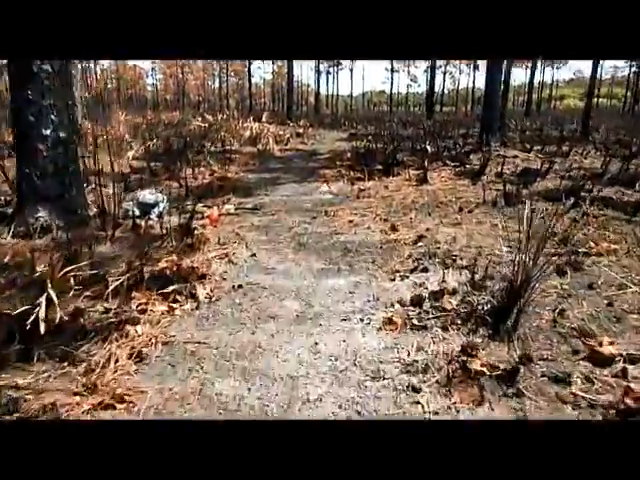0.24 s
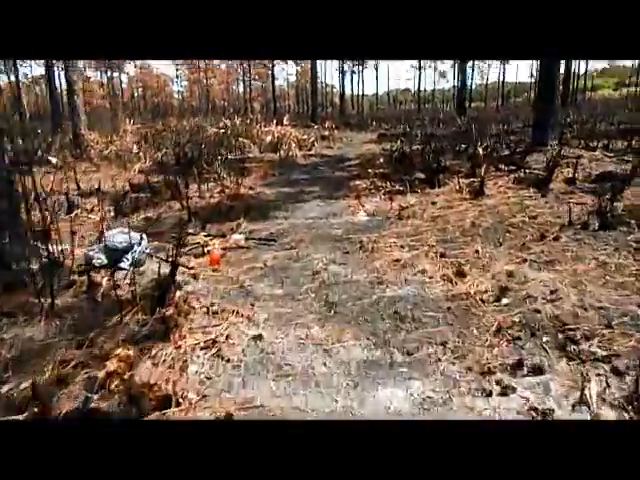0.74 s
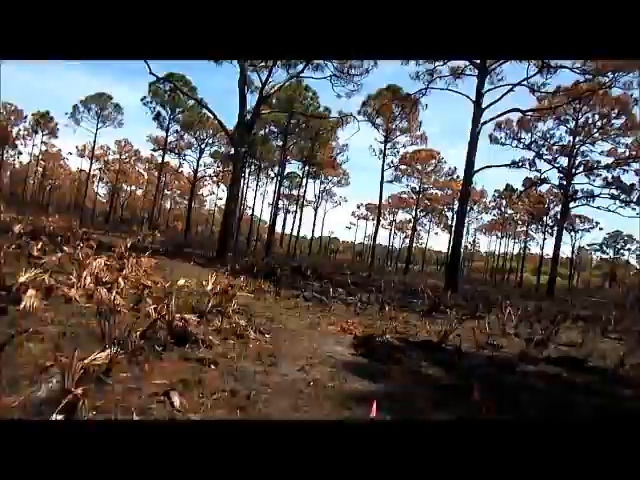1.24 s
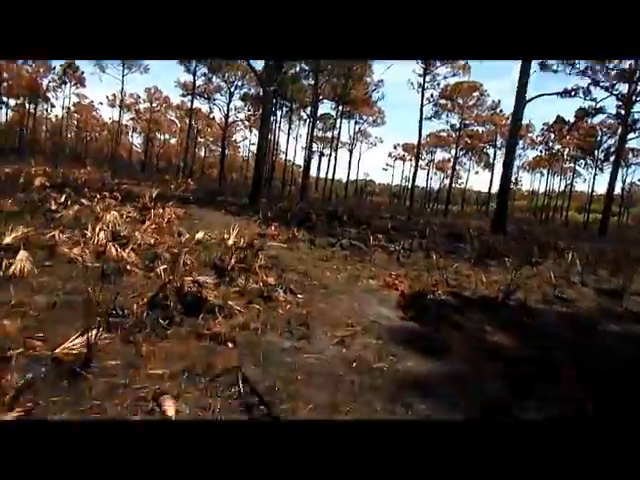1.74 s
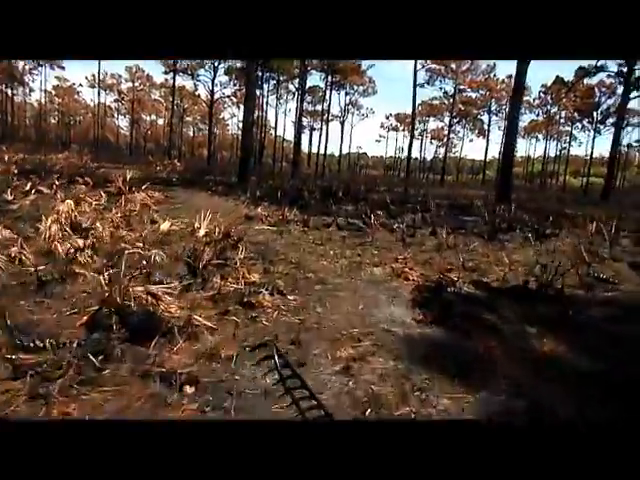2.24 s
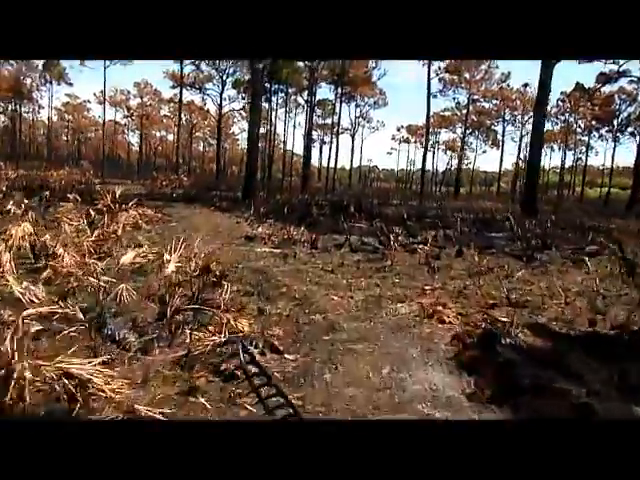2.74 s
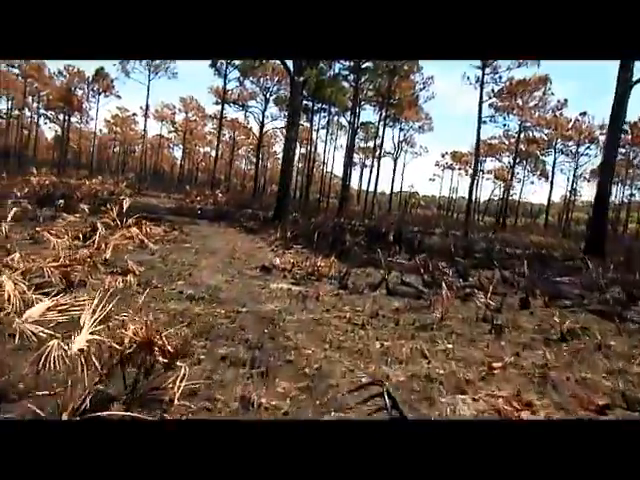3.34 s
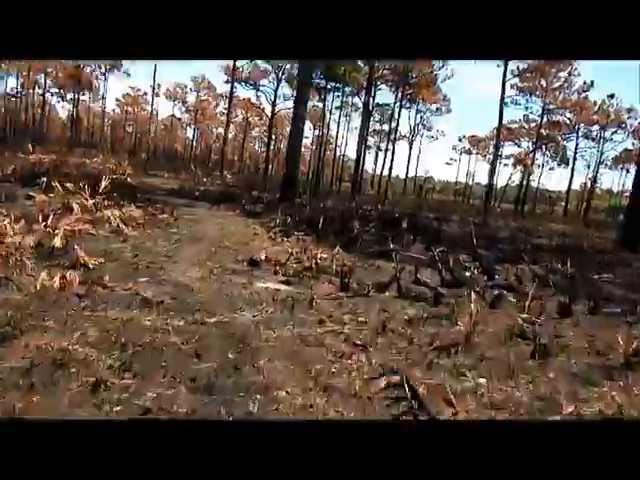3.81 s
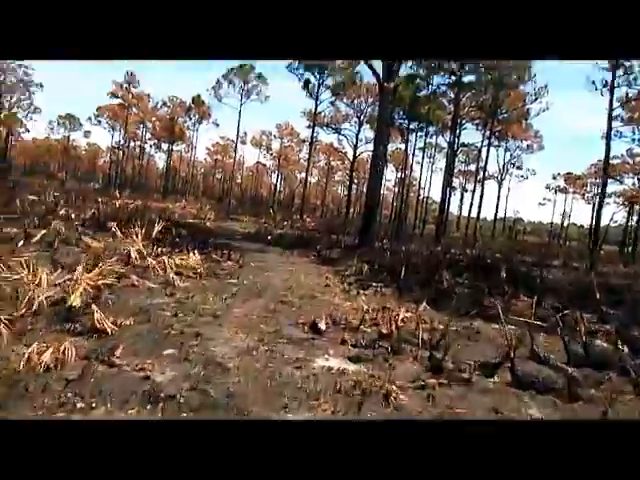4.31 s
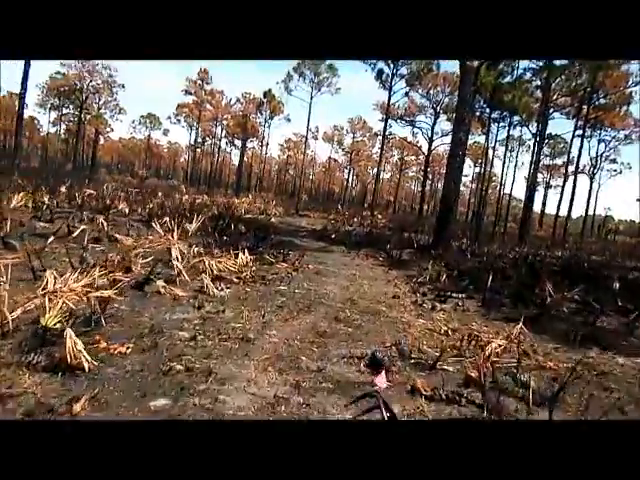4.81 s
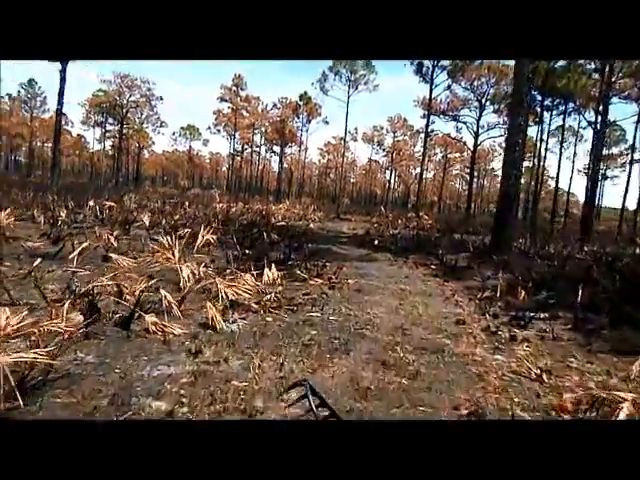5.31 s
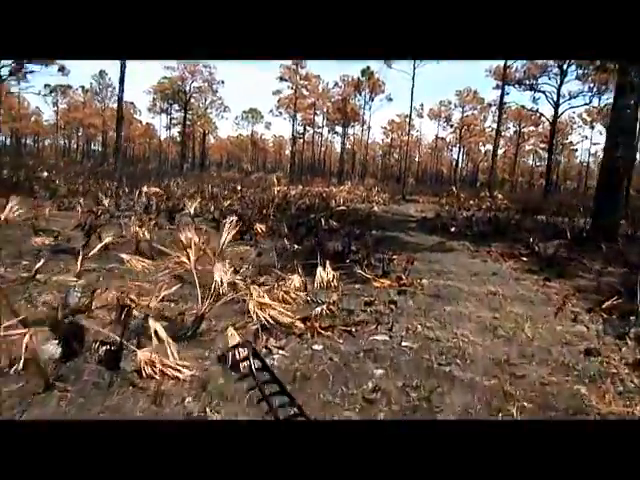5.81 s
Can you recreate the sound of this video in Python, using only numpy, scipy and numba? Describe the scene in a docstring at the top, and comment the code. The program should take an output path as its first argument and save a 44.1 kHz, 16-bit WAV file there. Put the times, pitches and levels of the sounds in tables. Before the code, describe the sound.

Continuous gritty crunching from bicycle tyres on sand, dead leaves and twigs, heard very close from a camera on the moving bike, outdoors with hardly any echo. Brittle pops and cracks jump out irregularly, a hard pair early on. Soft thuds carry through the frame at about half a second and two and a half seconds. A quick high bird trill sounds faintly in the distance, then crunching grows busier.

```python
"""Tyres of a mountain bike crush grit and burnt leaves on a dry trail, as dense short damped rings over a hiss.
Twigs snap as one ringing pitch with a spray of splinters; rumble and bumps reach the camera through the frame.
A sparrow whistles fast falling notes far off.
The rider's small camera hears through two ports: all but the frame sound reaches the right one a little first."""
import sys
import numpy as np
from scipy import signal
from scipy.fft import rfft, irfft
from scipy.io import wavfile
from scipy.ndimage import uniform_filter1d, minimum_filter1d, map_coordinates
from numba import njit

SR = 44100
rng = np.random.default_rng(int(sys.argv[2]) if len(sys.argv) > 2 else 0)


def materialize(psi):
    """Save the field psi as 16-bit PCM at rate SR to the path in sys.argv[1].

    A 1-D psi becomes a single channel; in a 2-D psi each row is a channel.
    """
    bounded = np.clip(np.atleast_2d(psi).T, -1, 1)
    quanta = np.round(bounded * 32767).astype(np.int16)
    wavfile.write(sys.argv[1], SR, quanta)


N = 267246
PORT_LAG, LAG_SPREAD = .95, .4  # samples: how late the left port is, and how much that varies with direction


# Tone of the crushed ground, with the camera housing: pitch_hz, relative level_db [dB per Hz]
LITTER_TONE = [(60, -66.5), (190, -17), (600, -4.5), (1200, -5.5), (2300, -0.5), (3000, 0.5), (4000, -5),
               (5500, -4), (6900, -1.5), (7900, -8.5), (10500, -15.5), (14000, -15), (15300, -18.5),
               (16300, -84)]
# Steady bed of grit under the tyres: start_s, relative level_db, extra_at_6khz_db, extra_from_12khz_db
GRIT_BED = [(0.0, -36, 3, -2), (0.29, -35.5, -3, -2.5), (1.5, -38.5, 0.5, -2), (1.59, -37, 0.5, 0.5),
            (3.22, -37, 1, -2.5), (3.43, -37.5, -1.5, 0), (4.32, -36.5, -1.5, 0), (5.1, -33.5, -3, -0.5),
            (5.38, -37.5, 3, 1), (5.67, -35, -4.5, 5.5), (6.06, -36.5, 2.5, -0.5)]
# Pitches where those three levels apply: pitch_hz
BED_PITCHES_HZ = [3000, 6000, 12000]


def litter(per_s=14000., fine=0.553, scatter_db=2.5, biggest=4.44, cycles=7.9, rise=0.27,
           clump_s=.012, clump_db=1.78, patch_s=.02, patch_db=2.5,
           dust_db=-7.0, sift_s=.08, sift_db=2.5, stir=0.65, apart=.55, litter_db=-32.5):
    """Grains of every size break in small clumps over sifting sand; both grow louder while a leaf is crushed."""
    bed_s, bed_db, treble_db, top_db = np.transpose(GRIT_BED)
    u = rng.random((150000, 5)).T
    start_s = np.cumsum(-np.log(1 - u[0]) / per_s)
    heard = start_s < N / SR
    start_s, u = start_s[heard], u[:, heard]
    # small bright grains are the most common: each higher octave holds more
    hz = np.maximum(16500 * u[1] ** (1 / fine), 150)

    db = np.interp(start_s, bed_s, bed_db) + crunching(start_s, hz)
    for extra_db, weights in ((treble_db, [0, 1, 0]), (top_db, [0, 0, 1])):
        weight = np.interp(np.log(hz), np.log(BED_PITCHES_HZ), weights)
        db += np.interp(start_s, bed_s, extra_db) * weight
    # each leaf crumbles as one
    db += clump_db * np.interp(start_s / clump_s, np.arange(2000), rng.standard_normal(2000))
    # and in its own range of pitch: one random level per half octave and patch_s
    half_octave = 2 * np.log2(hz / 300).clip(0)
    patches = rng.standard_normal((12, 1000))
    db += patch_db * map_coordinates(patches, [half_octave, start_s / patch_s], order=1)
    # a few grains are much stronger than the rest
    db += scatter_db * np.minimum(-np.log(1 - u[2]), biggest)
    size = hz ** (1 - fine / 2) * undb(db)  # size by pitch keeps the sum white
    lag = PORT_LAG + LAG_SPREAD * np.sqrt(12) * (u[3] - .5)
    grains = rings(start_s * SR, lag, hz, cycles * (.5 + u[4]), size, rise, N, 1. * SR)

    # sand is too fine for single grains: a hiss, its treble partly unlike at the two ports
    sand = late(rng.standard_normal(N), PORT_LAG)
    sand = sand + apart * high(rng.standard_normal((2, N)), 3900.0)
    now = np.arange(N) / SR
    # the sand lies unevenly
    drift_db = sift_db * np.interp(now / sift_s, np.arange(200), rng.standard_normal(200))
    steady_db = np.interp(now, bed_s, bed_db + (treble_db + top_db) / 2)
    stir_db = stir * crunching(now, 0 * now + BED_PITCHES_HZ[0])
    sand *= undb(steady_db + drift_db + stir_db)
    ground = level(grains, 0) + level(sand, dust_db)
    return level(colour(ground, LITTER_TONE), litter_db)


# Leaves and cones crushed, some at the same time, not strictly in order of start:
# start_s, length_s, level over the bed level_db, centre pitch_hz
CRUSHED = [(0.015, 0.085, 7.5, 5500), (0.11, 0.036, 5, 2960), (.163, 0.047, 4, 2700),
           (0.225, 0.043, 4, 2800), (.307, 0.13, 2.5, 3200), (0.466, 0.092, 2.5, 2780),
           (0.577, 0.066, 6.5, 2980), (0.812, 0.058, 3.5, 4500), (.9, 0.021, 4.5, 2830),
           (0.956, 0.039, 6, 3500), (.694, .12, 6.5, 3450), (1.031, 0.13, 5.5, 3370),
           (1.385, 0.032, 7, 1500), (1.429, 0.062, 8.5, 2870), (1.477, .1, 6, 2230),
           (1.62, 0.046, -0.5, 2490), (1.717, 0.15, 3.5, 3010), (1.867, 0.04, 9, 2810),
           (1.9, 0.057, 7, 2200), (1.998, 0.031, 6.5, 2750), (2.113, 0.073, 9, 2440),
           (2.21, 0.087, 4.5, 2230), (2.21, .05, 6, 11000), (2.3, 0.1, 6.5, 3040), (2.56, 0.063, 4.5, 3020),
           (2.635, 0.13, 3.5, 3000), (2.783, 0.14, 5.5, 2670), (3.028, 0.13, 5, 2920),
           (3.145, 0.12, 4.5, 2400), (3.344, .04, 6.5, 4500), (3.59, 0.049, 6, 2780),
           (3.862, 0.084, 7.5, 2860), (3.954, 0.052, 7, 2740), (4.09, 0.031, 9.5, 1190),
           (4.256, 0.021, 4, 2960), (4.318, .02, 10, 11000), (4.351, 0.063, 6, 2700),
           (4.505, .02, 9, 11000), (4.516, 0.077, 6.5, 3120), (4.574, 0.078, 4.5, 2610),
           (4.632, .015, 8, 11000), (4.652, 0.081, 6, 2390), (4.768, 0.042, 6, 2200),
           (4.854, 0.058, 4.5, 2870), (4.969, 0.033, 5.5, 2490), (5.007, 0.043, 6, 3500),
           (5.058, 0.023, 6, 2200), (5.112, 0.046, 9.5, 1410), (5.205, 0.044, 9.5, 2180),
           (5.28, .018, 8, 11000), (5.386, 0.023, 7, 3500), (5.422, 0.025, 10, 2300),
           (5.435, .015, 11, 13000), (5.49, 0.23, 5, 3410), (5.726, .095, 5, 3210), (5.87, 0.036, 6, 1500),
           (5.928, .05, 2.5, 6500), (5.992, 0.028, 2.5, 2910)]


def crunching(t, hz, half_width_octaves=1):
    """Gain in dB at times t and pitches hz: each crunch swells, fades and favours its own range."""
    power = np.ones(len(t))
    for start_s, length_s, level_db, centre_hz in CRUSHED:
        a, b = np.searchsorted(t, [start_s, start_s + length_s])
        swell = np.sqrt(np.sin(np.pi * (t[a:b] - start_s) / length_s))
        octaves = np.log2(hz[a:b] / centre_hz)
        near = np.exp(-.5 * (octaves / half_width_octaves) ** 2)
        power[a:b] += (undb(level_db) ** 2 - 1) * swell * near
    return 10 * np.log10(power.clip(.01))


# Twigs and leaf stems that break, levels relative:
# start_s, ring_level_db, ring_pitch_hz, splinter_level_db, brightness_db (per band), fade_s (to lose 60 dB)
TWIGS = [(.0235, -16, 6900, -14, 0.5, 0.036), (0.0562, -12, 5490, -30, 0, 0.013),
         (.0685, -3, 4520, -8, 5.5, 0.0041), (.2426, -13, 2890, -18, -2, 0.006),
         (.2644, -7.5, 2930, -15, -4, .011), (0.3177, -13, 2970, -12, 0.5, 0.013),
         (.3495, -11, 3420, -24, 2, .0035), (0.3658, -4.5, 3430, -10, 9, 0.0059),
         (0.3875, -20, 2450, -8, -0.5, 0.0082), (.4105, -22, 5450, -13, -5, 0.011),
         (.4988, -7.5, 3220, -16, 2, 0.0059), (.5047, -10, 3150, -10.5, -7, 0.004),
         (.5818, -21, 7000, -19, 3, 0.0082), (0.6226, -7, 2800, -27, 0, 0.0044),
         (0.7074, -11.5, 2860, -9, -0.5, 0.0039), (.7127, -7, 3240, -31, -4, 0.0036),
         (0.7451, 8, 3750, 2, 1, 0.0052), (0.7563, 8.5, 3370, -2.5, 7, 0.0065),
         (0.7615, -3, 3950, -12, 2, 0.011), (0.7704, -5, 3010, -5, 3, 0.019),
         (0.7915, -7.5, 4350, -27, -1, 0.0055), (0.912, -8, 2720, -30, 9, .0072),
         (.9617, -11, 3750, -19, -4, 0.0065), (1.0953, -18, 2470, -12.5, 2.5, 0.012),
         (1.1381, -4, 4700, -40, 0, 0.0032), (1.158, -12, 2850, -42, -5, 0.0041),
         (1.2737, -13, 3700, -22, -8, 0.0054), (1.4467, -12.5, 2800, -12.5, 4.5, 0.019),
         (1.4597, -6.5, 2920, -15, 11, 0.0079), (1.52, -16.5, 7060, -24.5, 16, .01),
         (1.624, -13.5, 2420, -33, 0, 0.011), (2.0614, -22, 2660, -23, -5, 0.0065),
         (2.1508, -6, 1800, -13.5, -3, 0.0052), (2.2397, -1.5, 1240, 0.5, 3, 0.0049),
         (2.2516, -13, 2250, -9, 5.5, .0055), (2.2746, -10.5, 1720, -18, -4.5, 0.0067),
         (2.3871, 5.5, 2350, -18, -9.5, 0.0085), (2.4028, -1, 1950, -4, 1, 0.0055),
         (2.8044, -6.5, 2630, -19, -5.5, 0.005), (3.1972, -13, 1860, -31, 0, 0.0065),
         (3.2738, -6.5, 2940, -18, -3, 0.0054), (3.3139, -2, 5220, -8, 3.5, 0.019),
         (3.3375, -20, 3540, -9.5, 3, 0.0064), (3.516, -12, 3020, -13, -2, 0.021),
         (3.69, -17, 2280, -18, 1.5, 0.0097), (3.7548, -16, 3420, -12.5, -3, 0.0095),
         (3.779, -15.5, 4700, -20, 6, 0.039), (3.7821, -11, 6500, -18, 8, .011),
         (4.063, -16, 3090, -15, 0, 0.0076), (4.2037, 2.5, 6830, 1, 1.5, 0.008),
         (4.4025, -13, 3130, -10, -6.5, 0.0042), (4.5623, -14, 3070, -15, -4.5, 0.012),
         (4.6806, -8, 2500, -34, -20, 0.0027), (4.6852, -14.5, 6630, -15.5, 4, 0.013),
         (4.7002, -2, 1980, -6, 5, .0045), (4.7311, -17, 3070, -21.5, -7, .007),
         (4.7903, -18, 1640, -20.5, -8.5, 0.0062), (4.8787, -3.5, 2920, -6.5, 0, 0.015),
         (4.9092, -19, 2140, -13.5, 0.5, 0.0031), (5.545, -2, 6700, -14, 8, 0.0085),
         (5.558, 7.5, 2900, 1, -1, 0.0068), (5.5665, -2, 3030, -18.5, -11, 0.0055),
         (5.6145, -11, 6800, -3.5, -1.5, 0.0075), (5.619, -4, 6710, -15, 16, .0047),
         (5.6474, -7.5, 4590, -10, 6, 0.018), (5.6539, -13, 5340, -18, 0, 0.022),
         (5.6779, -6, 6800, -7, 2, 0.0079), (5.6817, -3, 2430, -6, 1, 0.0036),
         (5.7636, -6, 6400, -15, -6, .0028), (5.778, -14, 2880, -16, 5, .015),
         (5.7885, -16, 2450, -13, 1, 0.009), (5.8535, -5, 2770, -1, 6.5, 0.0083),
         (5.8732, -8, 1970, -13.5, -9.5, 0.0049), (5.9818, -12, 2440, -12, 0.5, 0.0094)]
# Bands of splinters: low_hz, high_hz, share of the twig's fade_s [ratio], relative level_db
SPLINTER_BANDS = [(533, 1800, 2.4, -11), (2080, 4100, 2.1, -8), (4240, 9200, 1.3, -5),
                  (9380, 15400, 0.56, -12)]


def snaps(ring_db=-4.0, spread=0.89, fall_db=20.0, away_db_per_octave=3.5, rise=0.3, thin_hz=537.0):
    """Each break rings its own pitch and a spray of splinter modes in four bands; treble dies first."""
    start_s, peak_db, ring_hz, splinter_db, bright_db, fade_s = np.vstack([TWIGS, small_snaps()]).T
    parts = 9  # splinters in each band
    u = rng.random((len(start_s), 4, parts, 3))
    lag = PORT_LAG + LAG_SPREAD * rng.standard_normal(len(start_s))
    out = rings(start_s * SR, lag, ring_hz, fade_s * ring_hz, undb(peak_db + ring_db), rise, N, 1. * SR)
    tone_hz, tone_db = np.transpose(LITTER_TONE)
    for k, (low_hz, high_hz, share, band_db) in enumerate(SPLINTER_BANDS):
        hz = low_hz * (high_hz / low_hz) ** ((np.arange(parts) + u[:, k, :, 0]) / parts)
        # splinters trail the first crack, ever fainter
        wait = u[:, k, :, 1] ** 5
        ring_s = share * fade_s[:, None] + 0 * hz
        start = start_s[:, None] + spread * ring_s * wait
        housing_db = np.interp(np.log(hz), np.log(tone_hz), tone_db)
        # splinters are weaker far from the ring of the twig
        away_db = away_db_per_octave * np.abs(np.log2(hz / ring_hz[:, None]))
        twig_db = (splinter_db + bright_db * (k - 3 / 2) + band_db)[:, None]
        db = twig_db + housing_db - housing_db.mean() - away_db - fall_db * np.sqrt(wait)
        size = undb(db) / 2 * np.sign(u[:, k, :, 2] - .5)
        out += rings(start.ravel() * SR, np.repeat(lag, parts), hz.ravel(), (ring_s * hz).ravel(),
                     size.ravel(), rise, N, 1. * SR)
    return high(out, thin_hz, order=4)  # twigs are too small to radiate bass


def small_snaps(count=320, faintest_db=-26.5, scatter_db=3.5, typical_fade_s=.003):
    """Rows like those of TWIGS for tiny stems that break at random moments and pitches."""
    u = rng.random((count, 5)).T
    start_s = u[0] * N / SR
    db = faintest_db + scatter_db * np.minimum(-np.log(1 - u[1]), 3)
    ring_hz = 1500 * 4.5 ** u[2]
    bright_db = 6.8 * (u[3] - .5)
    return np.transpose([start_s, db, ring_hz, db - 9.0, bright_db, typical_fade_s * (.5 + u[4])])


# Tone of the rolling rumble: pitch_hz, relative level_db [dB per Hz]
RUMBLE_TONE = [(15, -22), (30, -5), (50, -3), (80, 2), (130, 1), (200, -12.5), (300, 0), (500, -28)]
# Loudness of the rolling rumble before its flicker: start_s, level_db
RUMBLE_LEVEL = [(0.0, -70), (0.17, -76.5), (0.42, -70), (0.61, -57), (0.78, -70), (1.25, -75), (2.16, -64),
                (2.34, -59.5), (3.17, -70), (3.34, -73), (3.9, -63), (4.23, -63.5), (4.4, -62),
                (4.89, -63.5), (5.16, -54), (5.21, -57), (5.42, -68), (6.06, -67)]
# Bumps through the frame: start_s, relative level_db, pitch_hz
BUMPS = [(0.457, -30, 137), (.491, -27, 183), (.506, -22, 325), (0.5141, -7.5, 300), (0.524, -18, 455),
         (0.5297, -19, 300), (0.5375, -13, 373), (0.5423, -16.5, 240), (1.103, -39, 176), (1.739, -38, 170),
         (2.53, -9, 267), (2.5412, -3.5, 416), (2.547, -16, 316), (3.739, -31.5, 125), (3.8163, -21.5, 333),
         (5.06, -28, 230), (5.155, -36, 90), (5.2157, -18, 233), (5.228, -30, 110), (5.276, -32, 99),
         (5.309, -33, 94)]


def frame(push_db=1.0, knock_cycles=4.44, rise=0.43, upper=2.15, upper_db=-3.0, soften_hz=1370.0,
          flicker_db=5.5):
    """Rumble and dull knocks, noise and damped rings, come through the mount, alike at both ports."""
    now = np.arange(N) / SR
    roll_s, roll_db = np.transpose(RUMBLE_LEVEL)
    # the rumble flickers: 25 random levels a second, joined by lines
    wobble_db = flicker_db * np.interp(now * 25, np.arange(200), rng.standard_normal(200))
    roll = level(colour(rng.standard_normal((1, N)), RUMBLE_TONE)[0], 0)
    roll *= undb(np.interp(now, roll_s, roll_db) + wobble_db)

    start_s, db, hz = np.transpose(BUMPS)
    cycles = knock_cycles + 0 * start_s  # to lose 60 dB
    start, lag = start_s * SR, 0 * start_s
    knocks = rings(start, lag, hz, cycles, -undb(db + push_db), rise, N, 1. * SR)[1]
    # second mode of the mount
    knocks += rings(start, lag, upper * hz, cycles, undb(db + upper_db), rise, N, 1. * SR)[1]
    soften = signal.butter(2, soften_hz, fs=SR, output="sos")
    return roll + signal.sosfilt(soften, high(knocks, 94.0))


# Sparrow phrases, before small random changes to each note:
# start_s, first_top_hz, last_top_hz, first_level_db, middle_level_db, last_level_db
PHRASES = [(1.379, 7770, 7740, -33, -32, -36), (1.91, 7600, 7770, -33.5, -29, -32)]


def sparrow(note_s=0.0089, drop_hz=850, notes_per_s=46.87, echo_s=0.014, echo_db=-15.0,
            vary_db=2.0, loose_s=.0006):
    """Quick whistles, each a sine falling in pitch; trunks send back a faint repeat."""
    out = np.zeros(N)
    t = np.arange(int(note_s * SR)) / SR
    for notes, (start_s, first_hz, last_hz, *levels_db) in zip([3, 35], PHRASES):  # notes in each phrase
        for k, chance in enumerate(rng.standard_normal((notes, 3))):
            along = k / (notes - 1)
            top_hz = first_hz + (last_hz - first_hz) * along + 30 * chance[0]
            hz = top_hz - drop_hz * (t / note_s) ** 1.54
            swell = np.sin(np.pi * t / note_s) ** .5
            note = swell * np.sin(2 * np.pi * np.cumsum(hz) / SR)
            db = np.interp(along, [0, .5, 1], levels_db) + vary_db * chance[1]
            i = int((start_s + k / notes_per_s + loose_s * chance[2]) * SR)
            out[i:i + len(t)] += note * undb(db)
    echo = undb(echo_db) * np.roll(out, int(echo_s * SR))
    return late(out + echo, PORT_LAG)


@njit
def rings(start, lag, hz, cycles, size, rise, n, sr):
    """Damped sines that swell over rise cycles and lose 60 dB in their cycles; left is lag samples late."""
    out = np.zeros((2, n))
    for g in range(len(start)):
        w = 2 * np.pi * hz[g] / sr
        pole = w * (1j - np.log(1000) / (2 * np.pi * cycles[g]))
        swell = -hz[g] / sr / rise
        p, q = np.exp(pole), np.exp(swell)  # change from one sample to the next
        for c in range(2):
            t = start[g] + (lag[g] if c == 0 else 0.)
            i = int(t) + 1
            z = size[g] * np.exp(pole * (i - t))
            shut = np.exp(swell * (i - t))
            for j in range(max(i, 0), min(n, i + int(cycles[g] * sr / hz[g]) + 1)):
                out[c, j] += z.imag * (1 - shut)
                z *= p
                shut *= q
    return out


def late(x, lag):
    """Both ports of one sound, left lag samples late."""
    spectrum = rfft(x)
    turn = np.exp(-2j * np.pi * lag * np.arange(len(spectrum)) / len(x))
    return np.array([irfft(spectrum * turn, len(x)), x])


def colour(x, points):
    """Causal filter through (Hz, dB) points, built from the cepstrum of the log gain."""
    hz, db = np.transpose(points)
    size = 4096
    grid_hz = np.arange(size // 2 + 1) * SR / size + 1
    ceps = irfft(np.log(undb(np.interp(np.log(grid_hz), np.log(hz), db))))
    # folding the later half onto the first makes the filter causal
    ceps[1:size // 2] *= 2
    ceps[size // 2 + 1:] = 0
    return signal.fftconvolve(x, irfft(np.exp(rfft(ceps)))[None], axes=1)[:, :N]


def high(x, hz, order=2):
    """High-pass: take away the bass below hz."""
    return signal.sosfilt(signal.butter(order, hz, "high", fs=SR, output="sos"), x)


def undb(db):
    """Decibels to gain."""
    return 10 ** (np.asarray(db) / 20)


def level(x, db):
    """Scale to an rms level."""
    return x * undb(db) / np.sqrt(np.mean(x ** 2))


def scene():
    """All sources at the two ports."""
    return litter() + snaps() + frame() + sparrow()


def record(dry, mono_below_hz=950, top_hz=16000):
    """The bass is made alike in both channels; a quick limiter holds the hardest snaps and the top is cut."""
    mid, side = (dry[0] + dry[1]) / 2, (dry[0] - dry[1]) / 2
    # the difference between the channels fades out below mono_below_hz
    side = signal.sosfiltfilt(signal.butter(1, mono_below_hz, "high", fs=SR, output="sos"), side)
    both = np.array([mid + side, mid - side])
    room = np.minimum(1, .97 / (np.abs(both).max(axis=0) + 1e-9))
    # the gain dips around each peak, with smoothed edges
    gain = uniform_filter1d(minimum_filter1d(room, size=21), size=11)
    return signal.sosfilt(signal.ellip(8, .2, 70, top_hz, fs=SR, output="sos"), both * gain)


dry = scene()
out = record(dry)
materialize(out)
```